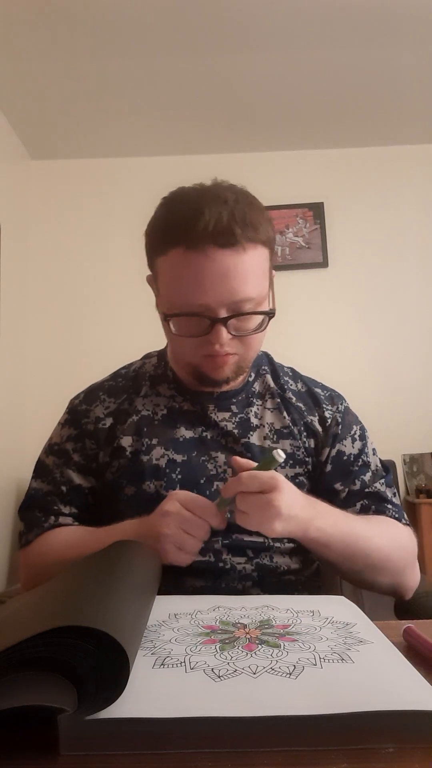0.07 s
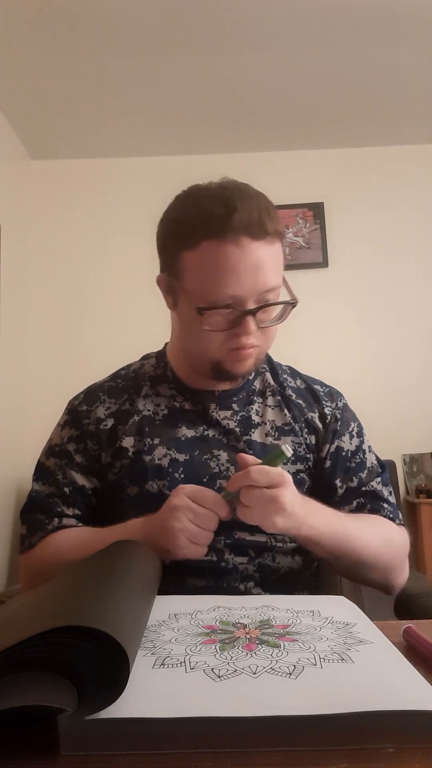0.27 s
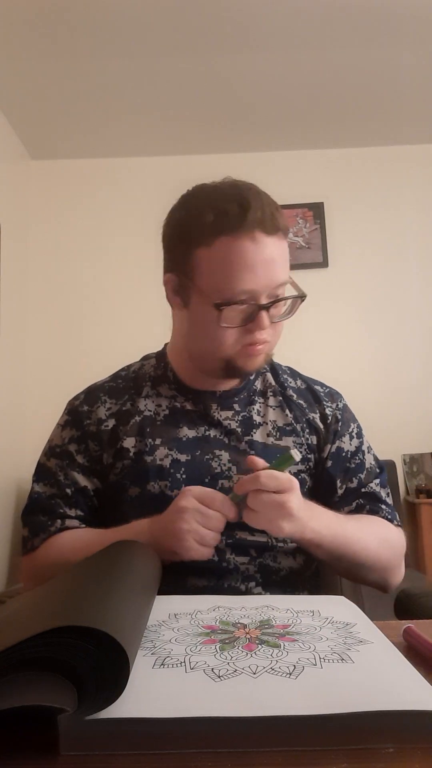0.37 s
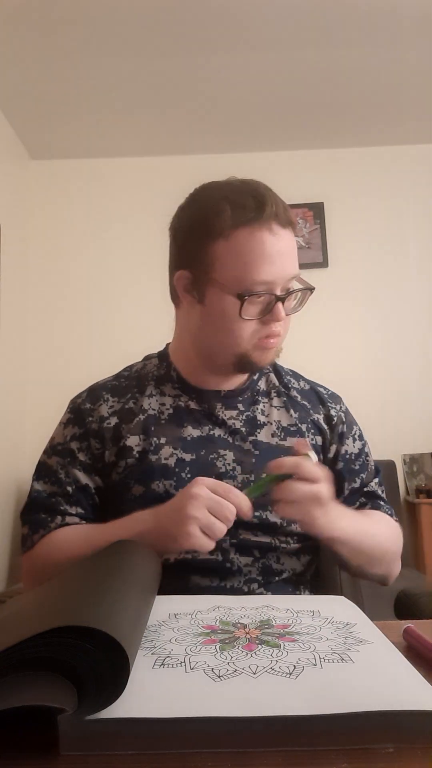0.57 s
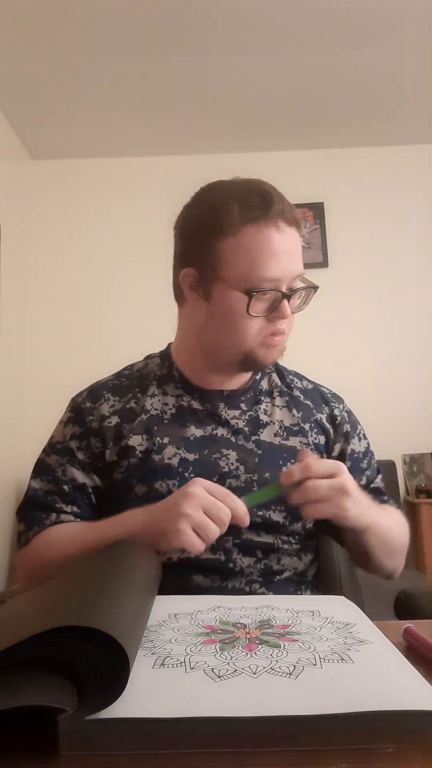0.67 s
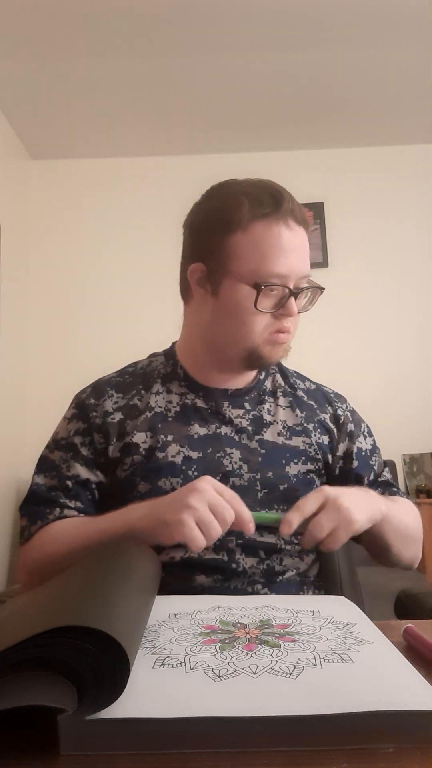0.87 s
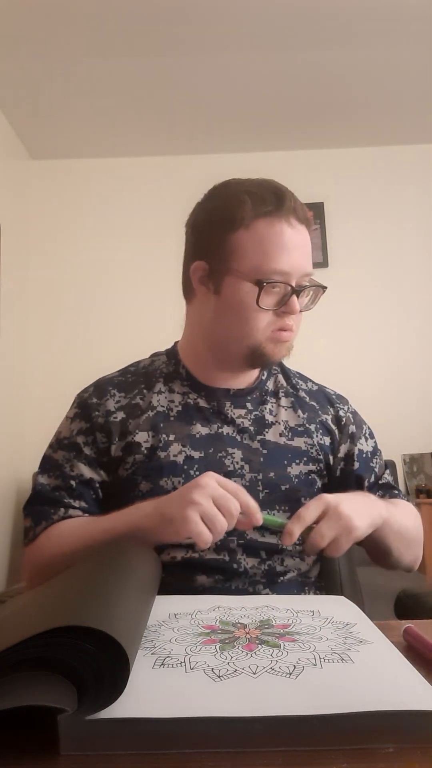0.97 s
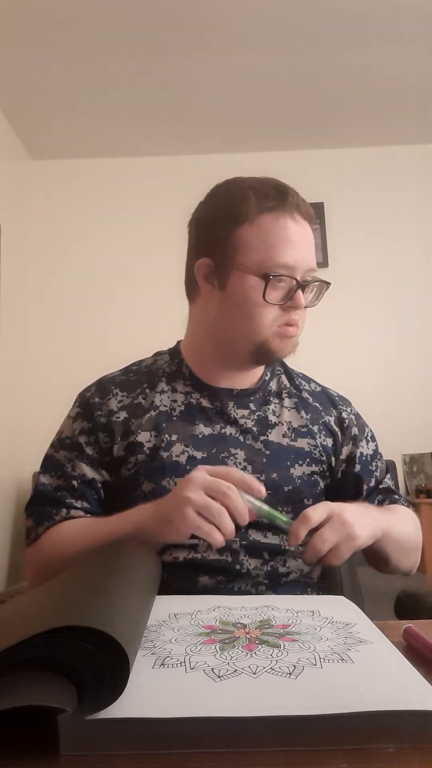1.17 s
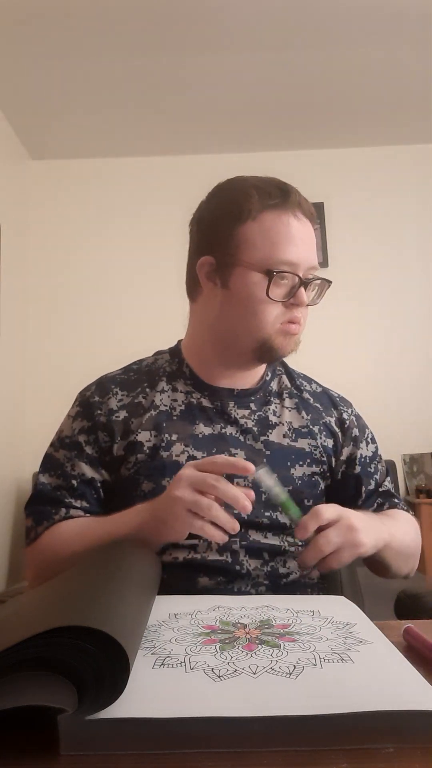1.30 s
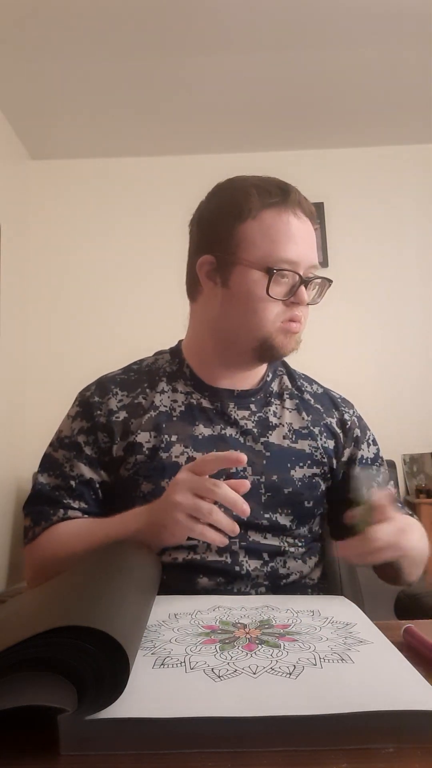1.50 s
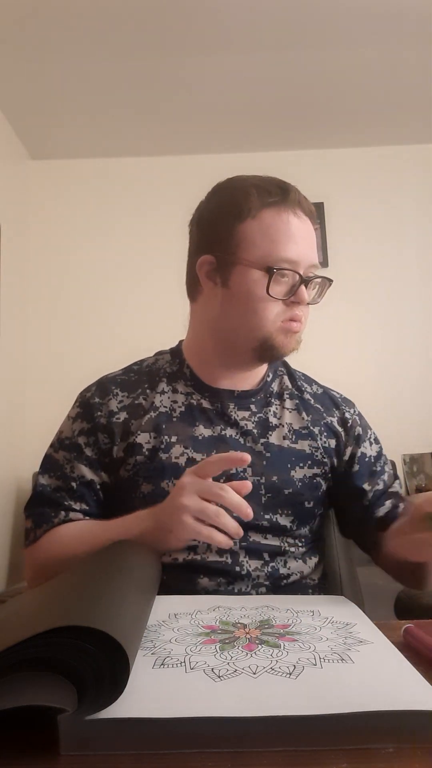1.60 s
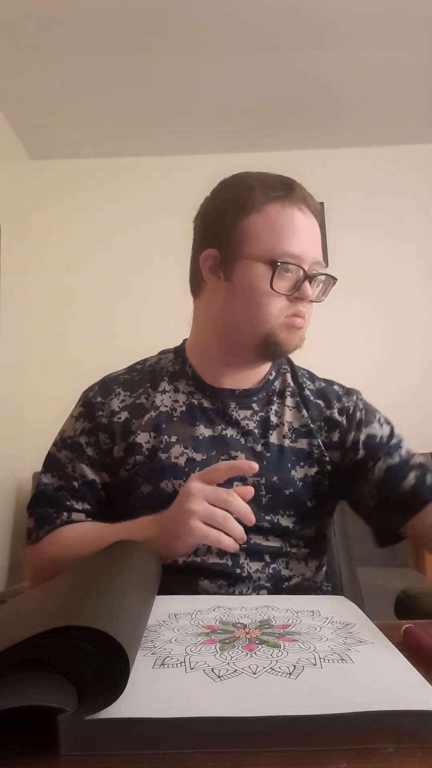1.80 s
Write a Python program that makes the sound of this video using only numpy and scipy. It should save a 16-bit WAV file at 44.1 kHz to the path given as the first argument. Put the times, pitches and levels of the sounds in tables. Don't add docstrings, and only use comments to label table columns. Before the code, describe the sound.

Close stereo phone pickup in a quiet living room: small taps on plastic, a sharp cap snap with a short room tail, then soft clothing movement and barely audible squeaks above a steady fan hum.

```python
import sys
import numpy as np
from scipy import signal
from scipy.fft import rfft, irfft, next_fast_len
from scipy.io import wavfile
from scipy.ndimage import uniform_filter1d, map_coordinates

SR = 44100
rng = np.random.default_rng(int(sys.argv[2]) if len(sys.argv) > 2 else 0)


def generate_wav(signal):
    frames = np.transpose(np.atleast_2d(signal))
    scaled = np.clip(frames, -1, 1) * 32767
    pcm = np.round(scaled).astype(np.int16)
    wavfile.write(sys.argv[1], SR, pcm)


def convert_level_to_amplitude(level_db):
    exponent = np.asarray(level_db, float) / 20
    return 10 ** exponent


N = 81585
T = np.arange(N) / SR

SLIP_S = [.24722, .24745, .2481, .2485, .2493, .2500, .2508]
# [f/Hz, left over right/dB]
LEFTWARD = [(900, -0.5), (1500, -0.5), (2200, 8), (4800, 7), (6500, -2), (9000, -2)]


def unit(x):
    return x / np.sqrt(np.mean(x ** 2) + 1e-20)


def along(points, hz):
    f, v = np.transpose(points)
    return np.interp(np.log(hz + 1), np.log(f + 1), v)


def wobble(rate_hz):
    knots = rng.standard_normal(int(N * rate_hz / SR) + 4)
    return map_coordinates(knots, [T * rate_hz])


def filtered(x, response):
    m = next_fast_len(N + SR // 2)
    return irfft(rfft(x, m) * response(np.fft.rfftfreq(m, 1 / SR)), m)[..., :N]


def pan(db):
    return convert_level_to_amplitude([[db / 2], [-db / 2]])


def leaning(x, balance):
    return filtered(x, lambda hz: convert_level_to_amplitude(np.outer([.5, -.5], along(balance, hz))))


def resonance(centre_hz, width_hz):
    return lambda f: 1 / (1 + (2 * (f - centre_hz) / width_hz) ** 2)


def rush(gain):
    # [f/Hz, correlation]
    alike = [(60, 0.93), (130, 0.4), (290, 0.99), (640, 0.67), (1400, -0.2), (3000, 0.012)]

    def mid_side(hz):
        turn = np.arccos(np.clip(along(alike, hz), -1, 1)) / 2
        return gain(hz) * [np.cos(turn), np.sin(turn)]

    mid, side = filtered(rng.standard_normal((2, N)), mid_side)
    return unit(np.array([mid + side, mid - side]))


def coloured(spectrum):
    return rush(lambda hz: convert_level_to_amplitude(along(spectrum, hz)))


def pulse(s, gain):
    x = filtered(np.arange(N) == round(s * SR), gain)
    return x / np.linalg.norm(x)


def rumble():
    # [f/Hz, density/dB]
    rumble_spectrum = [(15, -73.5), (25, -44), (64, -13.5), (145, -11.5), (173, -13.5), (209, -18),
                       (253, -1.5), (441, -14.5), (1600, -33), (2080, -58), (3520, -120)]
    return convert_level_to_amplitude(-52.5 + 0.5 * wobble(13.0)) * coloured(rumble_spectrum)


def hiss():
    # [f/Hz, density/dB]
    hiss_spectrum = [(760, -25), (1300, -2.5), (2810, -11), (3330, -19.5), (3900, -22), (6680, -13.5),
                     (9660, -28.5), (12600, -21), (16200, -33)]
    return convert_level_to_amplitude(-67 + 0.32 * wobble(2.8)) * coloured(hiss_spectrum)


def fan_hum():
    # [f/Hz, width/Hz, level/dB]
    hum = [(309, 27, -55.5), (325.1, 52, -54), (396.4, 60, -60.5), (522, 91, -63.5), (850.4, 25, -64),
           (903.3, 25, -66), (968, 370, -61)]
    # [f/Hz, level/dB, left over right/dB]
    tones = [(182.1, -65.5, 0), (249.6, -51.5, -2)]
    # [peak t/s, width/s, gain/dB]
    swell = (.39, .06, 13)
    out = np.zeros((2, N))
    for hz, width_hz, db in hum:
        out += convert_level_to_amplitude(db) * rush(resonance(hz, width_hz))
    peak_s, width_s, gain_db = swell
    swell_db = gain_db * np.exp(-((T - peak_s) / width_s) ** 2)
    for hz, db, pan_db in tones:
        phase = 2 * np.pi * hz * T + 1.3 * wobble(8)
        level_db = db + 2.6 * wobble(12) + (hz == tones[0][0]) * swell_db
        out += np.sqrt(2) * convert_level_to_amplitude(level_db) * np.sin(phase) * pan(pan_db)
    return out


def earlier_knock():
    # [f/Hz, width/Hz, level/dB]
    earlier = [(498, 210, 0), (1868, 750, 2), (2692, 380, 4), (3900, 2400, -12.5), (7200, 1600, -4.5),
               (12460, 3800, -16.5)]
    start_db, t60_s = -43.5, 0.31

    def gain(f):
        return np.sqrt(sum((convert_level_to_amplitude(db) * resonance(hz, width_hz)(f)) ** 2 for hz, width_hz, db in earlier))

    return convert_level_to_amplitude(start_db - 60 * T / t60_s) * rush(gain)


def air():
    return leaning(rumble() + hiss() + fan_hum(), LEFTWARD) * pan(.4) + earlier_knock()


def cloth():
    # [t/s, rise/s, fall/s, level/dB, bright over dull/dB]
    strokes = [(.44, .04, .06, -66, 3), (.49, .03, .06, -75, 4), (.553, .01, 0.16, -65, 1),
               (.565, 0.05, 0.13, -65, 5), (.66, 0.2, .25, -76, 1), (1.1, .35, 0.58, -66.5, -10),
               (1.4, .07, .13, -75, 10), (1.7, .08, .2, -81.5, 6)]
    # [f/Hz, density/dB]
    dull_spectrum = [(1500, -28), (2500, -10), (4500, -14.5), (7000, 1), (8200, -6.5), (9200, -18.5),
                     (11000, -9.5), (16000, -25)]
    # [f/Hz, density/dB]
    bright_spectrum = [(8500, -58), (9500, -18), (11500, -5.5), (13000, 0), (15000, -6), (16300, -17)]
    dull_power, bright_power = np.zeros((2, N))
    for s, rise_s, fall_s, db, bright_db in strokes:
        rise = np.sin(np.pi / 2 * np.clip((T - s) / rise_s, 0, 1)) ** 2
        fall = np.exp(-(2 * np.maximum(T - s - rise_s, 0) / fall_s) ** 2)
        dull_power += (convert_level_to_amplitude(db) * rise * fall) ** 2
        bright_power += (convert_level_to_amplitude(db + bright_db) * rise * fall) ** 2
    grain = convert_level_to_amplitude(1.78 * wobble(54))
    dull = np.sqrt(dull_power) * coloured(dull_spectrum)
    return grain * (dull + np.sqrt(bright_power) * coloured(bright_spectrum))


def thread_tone(hz, roughness):
    phase = 2 * np.pi * np.cumsum(hz * (1 + roughness * wobble(400))) / SR
    sides = [convert_level_to_amplitude(2 * wobble(60)) * np.sin(phase + wobble(60)) for _ in range(2)]
    return np.sqrt(2) * np.array(sides)


def sleeve():
    # [t/s, thread rate/Hz, level/dB]
    slide = [
        (1.15, 9400, -90),
        (1.2, 9600, -83),
        (1.345, 12150, -79),
        (1.42, 12950, -78),
        (1.5, 14150, -75),
        (1.555, 13800, -79),
        (1.6, 12200, -83),
        (1.65, 9800, -86),
        (1.69, 7500, -82),
    ]
    s, hz, db = np.transpose(slide)
    rate_hz = uniform_filter1d(np.interp(T, s, hz), size=1500)
    gain = convert_level_to_amplitude(np.interp(T, s, db, left=-150, right=-150))
    cross_start_s, cross_end_s, cross_ratio, cross_db = 1.225, 1.345, 1.225, -1
    cross_gate = np.clip(np.minimum(cross_end_s - T, T - cross_start_s) / .02, 0, 1)
    cross = convert_level_to_amplitude(cross_db) * cross_gate * thread_tone(cross_ratio * rate_hz, .004)
    return gain * (thread_tone(rate_hz, .005) + cross)


def chair_squeaks():
    # [t/s, length/s, f/Hz, level/dB]
    squeaks = [(1.33, .11, 6350, -66), (1.4, .3, 6320, -71), (1.31, .05, 6900, -73), (1.44, .12, 7300, -76),
               (.9, .3, 3850, -84), (1.43, .13, 3780, -81), (1.4, .06, 4650, -81), (1.68, .1, 4150, -83)]
    out = np.zeros((2, N))
    for start_s, length_s, hz, db in squeaks:
        shape = np.sin(np.pi * np.clip((T - start_s) / length_s, 0, 1))
        out += convert_level_to_amplitude(db) * shape * rush(resonance(hz, 120))
    return out


def ticks():
    # [t/s, level/dB, f/Hz, spread/octaves, left over right/dB]
    contacts = [(0.037, -43.5, 7000, 1.7, 1.5), (0.123, -54, 5000, 0.6, 1.5),
                (.1627, -45, 8000, 0.57, -1.5), (.164, -32, 520, 0.68, 6), (0.1642, -36, 1200, .2, 3),
                (0.1645, -40, 2400, .2, -3.5), (.1648, -43, 9000, .7, 0), (.1705, -33.5, 12950, .1, -5.5),
                (.1705, -46, 9900, .12, -3), (0.1709, -39.5, 6500, 1.3, 0), (.1735, -43.5, 6000, 0.77, 1.5),
                (0.559, -46.5, 8970, 0.88, -1)]
    # [f/Hz, gain/dB]
    ports = [(300, 11.5), (4000, -7), (7000, 1), (9300, -9), (12800, -0.5), (15500, -7.5), (16400, -24)]
    rise_s, fall_s = 0.00012, 0.0065
    out, sent = np.zeros((2, N)), np.zeros(N)
    for s, db, hz, octaves, pan_db in contacts:
        def colour(f):
            return convert_level_to_amplitude(along(ports, f)) * np.exp(-.5 * (np.log2((f + 1) / hz) / octaves) ** 2)

        after = np.maximum(T - s, 0)
        shape = convert_level_to_amplitude(-30 * after / fall_s) * (1 - np.exp(-after / rise_s))
        dry = convert_level_to_amplitude(db) * pan(pan_db) * rush(colour) * shape
        out += dry
        wet_db = 1 + 1.5 * np.log2(hz / 15740)
        sent += pulse(s, colour) * np.linalg.norm(dry[0]) * convert_level_to_amplitude(wet_db)
    return out, sent


def room(sent):
    # [f/Hz, t60/s]
    decay = [(500, .5), (2000, .44), (4500, .48), (8000, .4), (12000, .33), (16000, .28)]
    gap_s, build_s = .0035, 0.033
    hz, t, z = signal.stft(rng.standard_normal((2, SR)), SR, nperseg=256)
    z = z * convert_level_to_amplitude(-60 * t / along(decay, hz)[:, None])
    tail = signal.istft(z, SR, nperseg=256)[1]
    t = np.arange(tail.shape[1]) / SR
    tail = tail * (t > gap_s) * (1 - 0.33 * np.exp(-t / build_s))
    return signal.fftconvolve(sent[None], tail / np.linalg.norm(tail[0]), axes=1)[:, :N]


def snap_sent():
    # [f/Hz, density/dB]
    wet = [(400, -16.5), (1100, -14), (3110, -10), (5600, -3.5), (7400, 3.5), (9100, -11.5), (12700, -0.5),
           (15400, -8.5)]
    return convert_level_to_amplitude(8) * pulse(SLIP_S[1], lambda f: convert_level_to_amplitude(along(wet, f)))


def snap():
    # [level/dB, left over right/dB]
    slips = [
        (-17, 2.5),
        (2, -2.5),
        (-1.5, 0),
        (-3, -1.5),
        (-16.5, -2.5),
        (-9, -0.5),
        (-10, 12),
    ]
    # [f/Hz, level/dB, t60/s, left over right/dB]
    shell = [(1200, -25, 0.0092, 14), (2100, -19, .008, 2), (3460, -16, 0.0072, 5),
             (4200, -15, 0.0097, 6.5), (4800, -13.5, 0.0056, 8), (5733, -9.5, 0.013, -4),
             (6830, -4.5, 0.0074, -7), (7270, -2, 0.0065, -8.5), (8100, -13.5, 0.007, -8.5),
             (10900, -16, 0.01, -6.5), (12020, -4.5, 0.0072, -6.5), (12760, -7, 0.0037, -7),
             (14350, -15, 0.0058, -4)]
    snap_db, onset_s = -10, .0001
    out = np.zeros((2, N))
    hz, db, t60_s, mode_pan_db = np.transpose(shell)[:, :, None]
    for s, (level_db, slip_pan_db) in zip(SLIP_S, slips):
        i = int(s * SR)
        t = np.maximum(T[i:i + 2000] - s, 0)
        size_db = rng.normal(0, 2.4, (2, len(shell), 1))
        phase = rng.uniform(-0.2, 1.0, (2, len(shell), 1))
        half_db = (mode_pan_db + slip_pan_db) / 2
        decay_db = db + size_db + [half_db, -half_db] - 60 * t / t60_s
        rings = convert_level_to_amplitude(decay_db) * np.sin(2 * np.pi * hz * t + phase)
        out[:, i:i + 2000] += convert_level_to_amplitude(snap_db + level_db) * (1 - np.exp(-t / onset_s)) * rings.sum(axis=1)

    thud_hz, thud_db, thud_t60_s, thud_pan_db = 430, -30, .012, 5
    late = np.maximum(T - SLIP_S[1], 0)
    thud = convert_level_to_amplitude(-60 * late / thud_t60_s) * np.sin(2 * np.pi * thud_hz * late)
    out += convert_level_to_amplitude(thud_db) * pan(thud_pan_db) * thud

    crack_db, crack_t60_s = -1.5, .015
    after = np.maximum(T - SLIP_S[0], 0)
    modes = [(f, d) for f, d, *_ in shell]
    crack = coloured([(300, -46.5)] + modes + [(16500, -27)])
    crack = crack * convert_level_to_amplitude(-60 * after / crack_t60_s) * (after > 0)
    out += convert_level_to_amplitude(snap_db + crack_db) * crack
    return filtered(out, lambda f: (1j * f / (200 + 1j * f)) ** 2)


def scene():
    cap = snap()
    touches, sent = ticks()
    wall_s, wall_db = 0.01, -20.5
    wall = convert_level_to_amplitude(wall_db) * np.roll(cap[::-1], round(wall_s * SR), axis=1)
    clicks = cap + wall + touches + room(sent + snap_sent())
    return clicks + air() + leaning(cloth() + sleeve() + chair_squeaks(), LEFTWARD)


def band_limit(x):
    return signal.sosfilt(signal.butter(12, 15800, fs=SR, output="sos"), x)


def record(dry):
    # [f/Hz, left over right/dB]
    mics = [(600, 0.5), (1200, 5), (3000, 7), (4800, 4.5), (7000, 1.5), (9400, -2.5), (11000, 0),
            (15500, -2)]
    top_hz, above_db = 15740, -36
    mix = filtered(leaning(dry, mics), lambda hz: convert_level_to_amplitude(above_db * np.clip((hz - top_hz) / 100, 0, 1)))
    mix = np.clip(mix, -1, 1)
    return band_limit(mix)


dry = scene()
out = record(dry)
generate_wav(out)
```